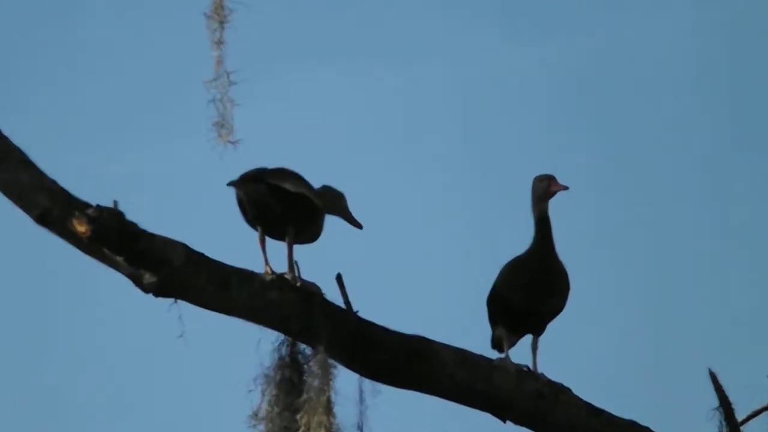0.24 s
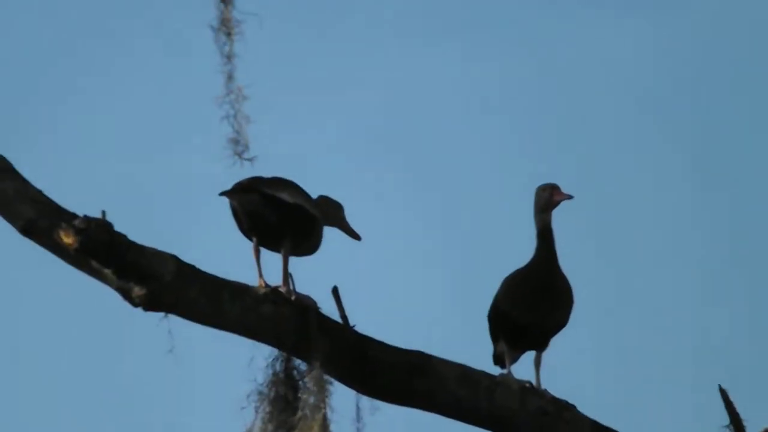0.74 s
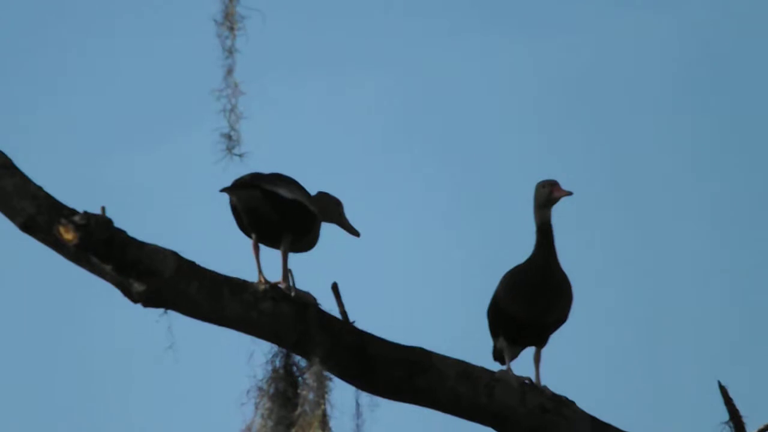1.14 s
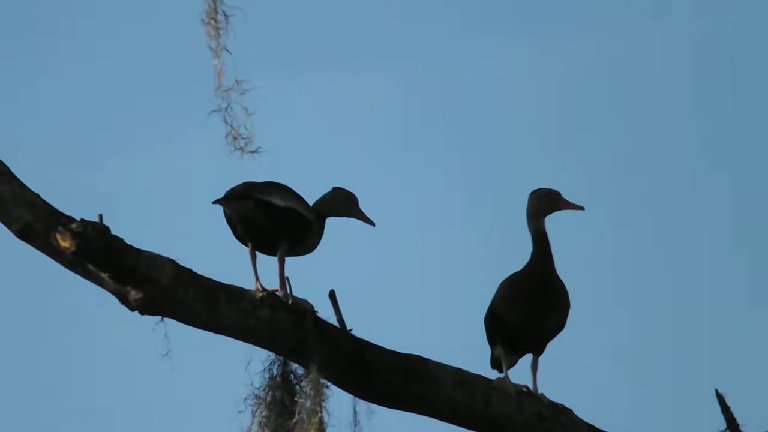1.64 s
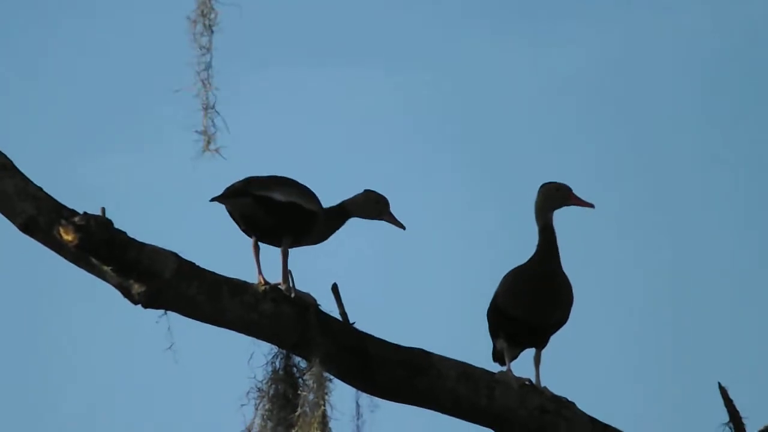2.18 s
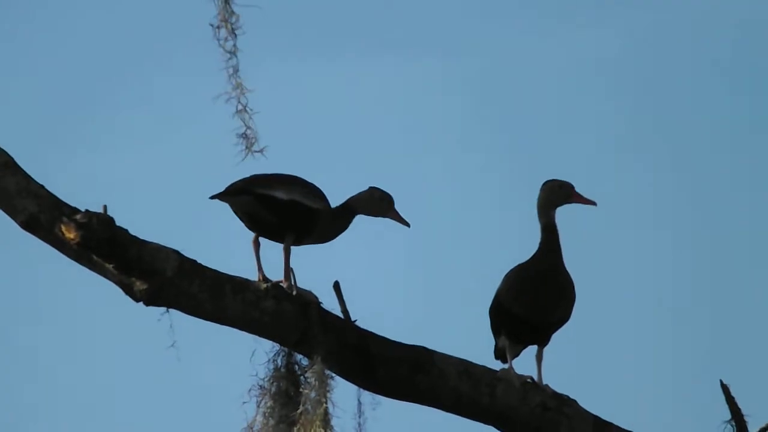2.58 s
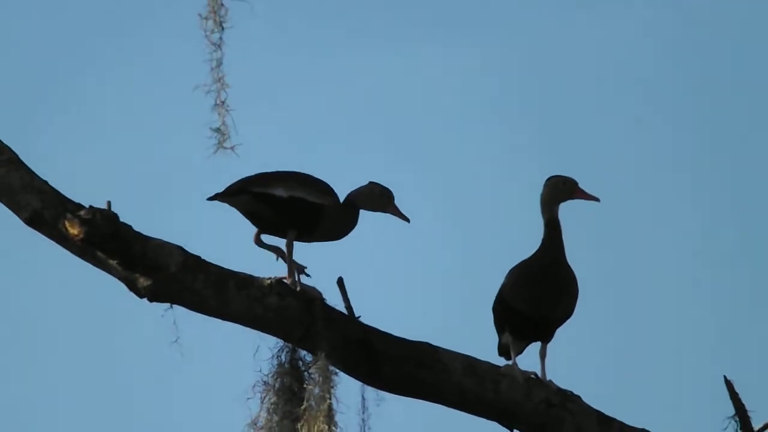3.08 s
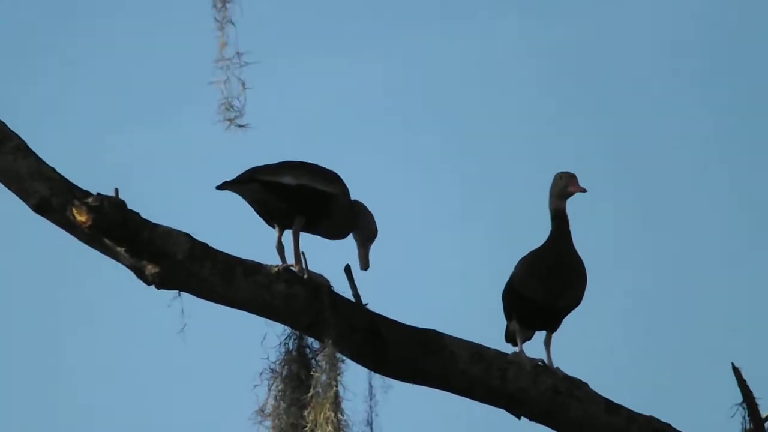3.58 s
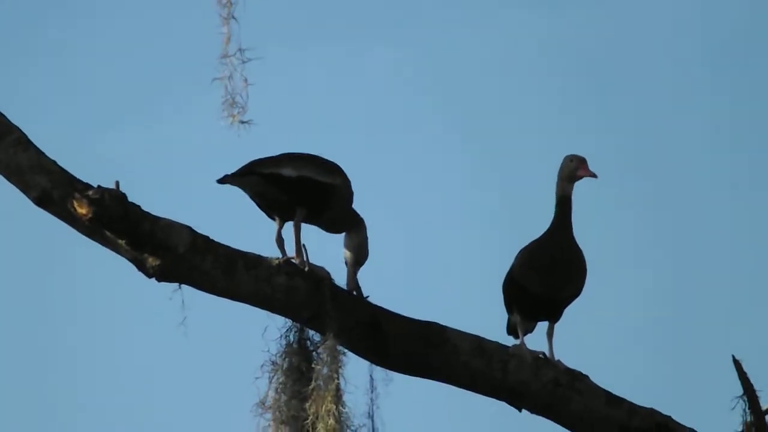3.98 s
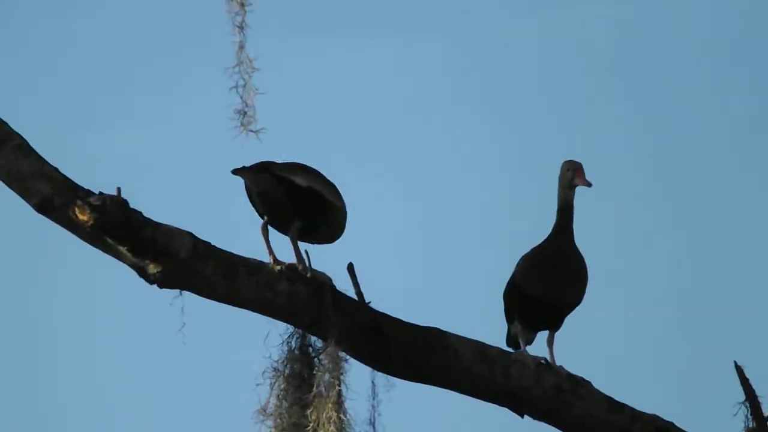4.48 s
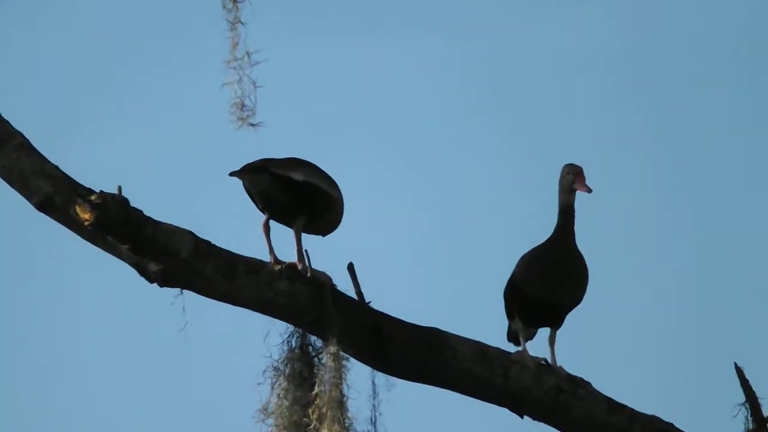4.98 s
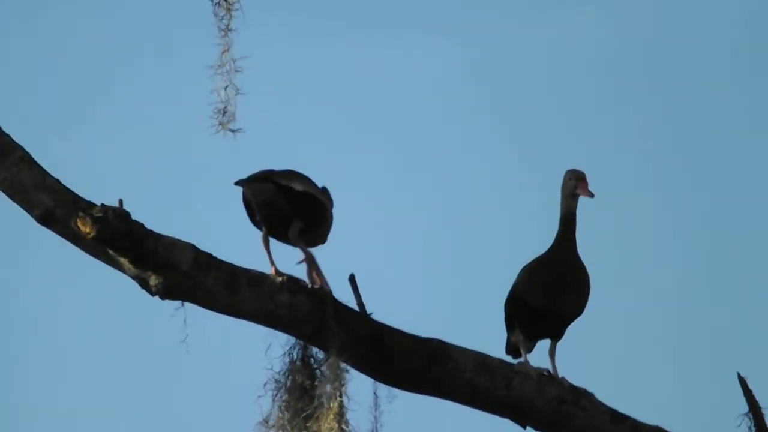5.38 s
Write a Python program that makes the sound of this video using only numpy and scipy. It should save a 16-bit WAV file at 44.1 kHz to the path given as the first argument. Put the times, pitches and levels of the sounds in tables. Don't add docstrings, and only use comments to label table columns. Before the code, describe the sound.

Outdoors at a marsh, a distant flock whistles over low air rumble and a soft insect trill. A harsh plastic snap hits the microphone early. Near ducks then squeal, sweep upward and chatter in rapid high pips, thickening to four loud yelping barks, then a softer run of hoots. The end is quiet, with faint far calls. Leaves blur the calls and trees echo them; the sound is centred, practically mono.

```python
import sys
import numpy as np
from scipy import signal
from scipy.io import wavfile
from scipy.ndimage import uniform_filter1d

SR = 44100
rng = np.random.default_rng(int(sys.argv[2]) if len(sys.argv) > 2 else 0)


def file_out(sig):
    cols = np.atleast_2d(sig).T
    lim = np.clip(cols, -1, 1)
    pcm = np.round(lim * 32767).astype(np.int16)
    wavfile.write(sys.argv[1], SR, pcm)


def nominal_scale(level):
    x = np.asarray(level, float) / 20
    return 10 ** x


N = 248283

# time in seconds, pitch in Hz, level in dB.
SQUEAL_CURVES = [
    [(0.768, 2156, -31.5), (0.782, 2760, -21), (0.815, 3280, -20), (0.845, 3394, -14), (0.866, 3353, -19),
     (0.882, 2820, -20.5), (0.905, 2665, -27)],
    [(1.02, 2740, -24.5), (1.04, 3880, -43), (1.065, 4350, -43.5), (1.087, 3210, -25.5)],
    [(1.083, 3188, -20), (1.15, 3090, -16), (1.19, 3169, -16.5), (1.24, 3350, -20.5), (1.27, 3760, -26.5),
     (1.3, 4610, -32.5), (1.345, 4780, -33.5), (1.37, 4620, -43), (1.44, 4630, -44)],
    [(2.005, 2073, -37), (2.03, 2600, -26.5), (2.05, 2894, -15), (2.078, 2834, -16), (2.09, 2290, -30),
     (2.102, 1980, -47)],
]
# start in seconds, level in dB.
BARK_STARTS = [
    (3.587, -14.5),
    (3.69, -13),
    (3.796, -13.5),
    (3.9, -13.5),
]
# seconds after the start, pitch in Hz, relative level in dB.
BARK_CURVE = [
    (0, 2322, -20.5),
    (.01, 2657, -3),
    (.014, 3195, -1),
    (0.034, 3298, -8),
    (.044, 3190, -8),
]
# start in seconds, climb in seconds, hold in seconds, level in dB.
SWEEP_NOTES = [
    (1.499, 0.094, 0.061, -18.5),
    (1.706, .056, 0.025, -20),
]

# start in seconds, middle pitch in Hz, level in dB.
PIP_RUN = [
    (2.195, 2872, -18.5),
    (2.282, 2930, -17.5),
    (2.369, 2950, -19.5),
    (2.455, 2930, -22),
    (2.543, 2943, -23.5),
    (2.633, 2840, -26.5),
    (2.813, 2920, -27),
    (3.349, 3074, -17.5),
    (3.442, 3083, -18),
]
# start in seconds, middle pitch in Hz, level in dB.
HOOT_RUN = [
    (4.15, 2778, -25.5),
    (4.235, 2792, -24.5),
    (4.325, 2865, -24.5),
    (4.413, 2873, -24),
    (4.501, 2922, -23.5),
    (4.59, 2808, -25),
    (4.686, 2927, -26.5),
    (4.786, 2795, -27),
]
# start in seconds, length in seconds, middle pitch in Hz, level in dB.
PEEP_NOTES = [
    (2.105, 0.0364, 2870, -20),
    (3.075, 0.034, 2997, -24),
    (3.166, 0.05, 3140, -22),
    (3.258, 0.048, 3140, -20.5),
    (3.315, .04, 3370, -23),
    (3.493, 0.038, 3326, -14.5),
    (3.538, 0.036, 3154, -17.5),
    (3.632, 0.035, 3185, -21.5),
    (3.735, 0.042, 3210, -20),
]
# start in seconds, length in seconds, middle pitch in Hz, level in dB.
CLUCK_NOTES = [
    (1.64, 0.038, 2920, -32.5),
    (1.85, 0.027, 2810, -23.5),
    (1.935, 0.024, 2835, -25),
    (2.02, 0.028, 2820, -24.5),
    (2.745, .013, 2840, -23),
    (2.76, .022, 3180, -21.5),
    (3.378, 0.019, 2960, -22),
    (3.472, 0.012, 3007, -18.5),
    (3.66, 0.0088, 2860, -24),
]
# start in seconds, length in seconds, middle pitch in Hz, level in dB.
DIVE_NOTES = [
    (1.465, .03, 2890, -30),
    (1.8, .025, 3000, -36),
    (1.87, .02, 2200, -40),
    (1.958, 0.023, 2280, -26.5),
    (2.255, 0.019, 2220, -40),
]
# start in seconds, length in seconds, middle pitch in Hz, level in dB.
STOOP_NOTES = [
    (2.215, .022, 3200, -27),
    (2.295, 0.043, 3290, -26.5),
    (2.383, 0.035, 3190, -25.5),
    (2.467, .036, 3480, -25.5),
    (2.555, 0.035, 3360, -24),
    (2.59, 0.073, 3370, -29.5),
]
# start in seconds, length in seconds, middle pitch in Hz, level in dB.
ARCH_NOTES = [
    (2.638, .049, 3646, -24.5),
    (2.723, .04, 3500, -20.5),
    (2.818, .045, 3437, -23.5),
    (2.918, 0.047, 3320, -27),
    (3.012, 0.045, 3530, -24.5),
    (3.112, 0.044, 3760, -27),
    (3.205, .05, 3547, -25),
]

# start in seconds, length in seconds, middle pitch in Hz, level in dB.
REEDY_FALL_NOTES = [(.795, 0.037, 2157, -34.5), (1.64, 0.018, 2404, -38.5), (2.29, 0.03, 2256, -38),
                    (2.385, 0.046, 2380, -38), (2.485, 0.02, 2390, -39), (2.55, 0.028, 2200, -27.5),
                    (2.59, 0.015, 2350, -39), (2.652, 0.051, 2180, -29), (2.895, 0.057, 2108, -28),
                    (3, 0.045, 2229, -26), (3.105, 0.057, 2170, -27.5), (3.22, .05, 2286, -29.5),
                    (3.405, 0.026, 2348, -34.5), (3.53, 0.039, 2230, -44.5), (3.59, 0.044, 1958, -32.5),
                    (3.705, 0.052, 1970, -32), (3.81, .056, 1926, -33.5), (3.94, 0.046, 1888, -34)]
# start in seconds, length in seconds, middle pitch in Hz, level in dB.
REEDY_ARCH_NOTES = [
    (2.447, 0.035, 2120, -37),
    (2.715, .095, 2500, -31.5),
    (2.85, .06, 2155, -31),
    (2.985, 0.017, 2400, -32),
]
# start in seconds, length in seconds, middle pitch in Hz, level in dB.
REEDY_RISE_NOTES = [
    (2.195, 0.055, 2340, -46.5),
    (4.065, 0.019, 2484, -39),
]
# start in seconds, length in seconds, middle pitch in Hz, level in dB.
CRACKED_NOTES = [
    (4.03, 0.0516, 2418, -33),
]

# start in seconds, length in seconds, middle pitch in Hz, level in dB.
FAR_BOW_NOTES = [
    (.705, 0.13, 3496, -43.5),
    (1.86, .17, 3540, -38),
    (4.17, 0.054, 3130, -38.5),
    (4.27, 0.031, 3050, -36),
    (4.3, 0.11, 3420, -45),
    (4.87, 0.077, 3400, -64),
    (2.26, .15, 1965, -38),
    (4.9, 0.12, 1980, -49),
]
# start in seconds, length in seconds, middle pitch in Hz, level in dB.
FAR_SAG_NOTES = [
    (.93, 0.22, 1340, -46),
    (1.15, .24, 2080, -50),
    (2.19, 0.056, 1910, -35.5),
    (2.5, 0.27, 1396, -46),
    (3.58, 0.1783, 1680, -47.5),
    (4.2, 0.19, 1385, -44),
    (3.2, 0.068, 1546, -37),
    (3.985, 0.063, 2050, -45),
    (1.77, .03, 2100, -40),
    (4.42, .14, 1400, -48),
]
# start in seconds, length in seconds, middle pitch in Hz, level in dB.
FAR_LEVEL_NOTES = [
    (0.16, 0.18, 2000, -63.5),
    (5.42, .08, 2990, -48.5),
    (8.5, .06, 7150, -50),
    (6.2, .1, 3300, -39.5),
    (5.18, 0.04, 2900, -46.5),
    (5.11, .04, 5950, -61),
]
# start in seconds, length in seconds, middle pitch in Hz, level in dB.
FAR_REEDY_NOTES = [
    (5.468, .05, 1700, -42.5),
    (5.56, .05, 1745, -40.5),
]
# start in seconds, length in seconds, middle pitch in Hz, level in dB.
FAR_RISE_NOTES = [
    (5.365, .045, 1723, -41.5),
]
# start in seconds, length in seconds, middle pitch in Hz, level in dB.
SCREECH_NOTES = [
    (5.104, .3, 1128, -59),
]

# level in dB, from the fundamental up.
NEAR_PARTIALS = [-1.5, -26.5, -34.5]
BARK_PARTIALS = [1, -26.5, -34]
ARCH_PARTIALS = [-3, -26, -35]
SQUEAL_PARTIALS = [-2.5, -28.5, -41.5]
REEDY_PARTIALS = [-2.5, -5, -18, -23.5]
CRACKED_PARTIALS = [1.5, -14, -23.5]
FAR_PARTIALS = [2, -24.5]
FAR_REEDY_PARTIALS = [-6, -2, -17]
SCREECH_PARTIALS = [-33, -31, -19, -14, -10, -2, -2]
# frequency in Hz, gain in dB.
WINDPIPE_GAIN = [(1200, -11), (1900, -15), (2300, -3.5), (2800, 2.5), (3500, 3), (4100, 1), (4900, 9),
                 (5700, 4), (6500, -4), (7400, 4), (8400, -6.5), (9400, -5.5), (11000, -5), (15000, -24.5)]

# frequency in Hz, time to fall 60 dB in seconds.
MARSH_DECAY = [(1000, 1), (3000, 0.72), (6000, 0.99), (10000, 1)]
# frequency in Hz, level in dB, time to fall 60 dB in seconds.
SHELL_MODES = [(1527, -8, 0.012), (2193, -7, 0.012), (1800, -11, 0.01), (2597, -0.5, 0.0052),
               (3250, 1, 0.011), (3514, 0, .012), (4780, -29.5, 0.011), (5500, -35.5, 0.0027),
               (7350, -32.5, 0.012), (8300, -21.5, 0.0017), (10030, -8, 0.0054), (12500, -21.5, 0.0046),
               (16100, -12.5, 0.004)]
# time in seconds, level in dB.
SHELL_BLOWS = [
    (0.3029, -13.5),
    (.3207, -19),
    (0.324, -18.5),
    (.3268, 5.5),
    (0.3288, 0.5),
    (0.3294, 1),
    (.3312, 2),
    (0.3323, -18),
]
# time in seconds, level in dB.
TICKS = [
    (.035, -54),
    (.055, -54),
    (.405, -51.5),
    (4.708, -54),
    (5.001, -51.5),
]
# time in seconds, level in dB.
FLOCK_LEVEL = [
    (0, -34),
    (.3, -37),
    (.7, -49),
    (1.5, -42),
    (3.002, -34),
    (4.5, -51.5),
    (5.1, -50.5),
    (5.63, -41),
]
# time in seconds, pulses per second, level in dB.
TRILL_CURVE = [
    (0, 19.75, -50.5),
    (2.799, 24, -50),
    (5.63, 19.65, -52.5),
]
# frequency in Hz, level in dB per Hz.
AIR_SPECTRUM = [(20, -0.5), (45, -0.5), (70, -7), (100, -4.5), (150, -15), (250, -20.5), (600, -27),
                (1250, -29.5), (3200, -25), (4200, -29), (5500, -45.5), (8000, -45.5), (12000, -50),
                (16000, -50.5)]

PIP, HOOT, PEEP, CLUCK, DIVE = (.92, 1.04), (.95, .92), (.9, .84), (1.02, .94), (1.17, .84)
STOOP, ARCH, DROOP, BOW, RISE = (1.02, .8), (.83, .7), (1, .8), (.82, .72), (.9, 1.07)
FAR_BOW, FAR_SAG, LEVEL, SCREECH = (.89, .9), (1.18, .9), (1.02, .98), (1.14, .95)


def whistle(hz, partials_db, rasp=.02, rasp_growth=.25):
    turn = 2 * np.pi * np.cumsum(hz) / SR
    noise = rng.standard_normal(len(hz))
    turbulence = evened(uniform_filter1d(uniform_filter1d(noise, 36), 36))
    out = np.zeros(len(hz))
    for k, db in enumerate(partials_db, 1):
        fray = 1 + (rasp + rasp_growth * min(k - 1, 2)) * turbulence
        level = np.sqrt(2) * nominal_scale(db + read(WINDPIPE_GAIN, k * hz))
        out += level * fray * np.sin(k * turn)
    return out


def notes(rows, partials_db, flat=2.307, rise=0.047, fade=0.13, rasp=0.039):
    out, shake, flutter = np.zeros(N), wander(60), wander(150)
    for s, length, first_hz, middle_hz, last_hz, db in rows:
        u = np.linspace(0, 1, round(length * SR))
        slope = (last_hz - first_hz) / 2
        arch = (first_hz + last_hz) / 2 - middle_hz
        hz = middle_hz + slope * (2 * u - 1) + arch * abs(2 * u - 1) ** flat
        wobble = 1 + .003 * np.resize(shake[round(s * SR):], len(u))
        ramp = np.minimum(u / rise, (1 - u) / fade)
        breath = np.sin(np.pi / 2 * np.clip(ramp, 0, 1)) ** 2
        add(out, s, nominal_scale(db) * breath * whistle(hz * wobble, partials_db, rasp))
    return out * nominal_scale(.8 * flutter)


def slurs(curves, partials_db):
    out = np.zeros(N)
    for rows in curves:
        s, hz, db = np.transpose(rows)
        t = np.arange(s[0], s[-1], 1 / SR)
        glide = uniform_filter1d(np.interp(t, s, hz), 200)
        soft_ends = signal.windows.tukey(len(t), 180 / len(t))
        add(out, s[0], nominal_scale(np.interp(t, s, db)) * soft_ends * whistle(glide, partials_db))
    return out * nominal_scale(1.7 * wander(200))


def shaped(rows, gesture, length=None):
    if length is not None:
        rows = [(s, length, hz, db) for s, hz, db in rows]
    first, last = gesture
    return [(s, span, first * hz, hz, last * hz, db) for s, span, hz, db in rows]


def barks():
    return [[(s + after, hz, db + rel) for after, hz, rel in BARK_CURVE] for s, db in BARK_STARTS]


def sweeps():
    low_hz, high_hz, loss_db = 2660, 5580, -17.5
    halfway_hz = low_hz + .47 * (high_hz - low_hz)
    curves = []
    for s, climb, hold, db in SWEEP_NOTES:
        top_s, top_db = s + climb, db + loss_db
        curves.append([(s, low_hz, db),
                       (s + climb / 2, halfway_hz, db + 0.43 * loss_db),
                       (top_s, high_hz, top_db),
                       (top_s + hold, .99 * high_hz, top_db - 6)])
    return curves


def near_ducks():
    chatter = shaped(PIP_RUN, PIP, 0.0213) + shaped(HOOT_RUN, HOOT, 0.0403)
    chatter += shaped(PEEP_NOTES, PEEP) + shaped(CLUCK_NOTES, CLUCK)
    arches = shaped(STOOP_NOTES, STOOP) + shaped(ARCH_NOTES, ARCH) + shaped(DIVE_NOTES, DIVE)
    calls = slurs(barks(), BARK_PARTIALS) + notes(chatter, NEAR_PARTIALS, flat=2.2, fade=0.26)
    return calls + notes(arches, ARCH_PARTIALS, flat=2.7, rise=.1, fade=.25, rasp=.1)


def hidden_ducks():
    reedy = shaped(REEDY_FALL_NOTES, DROOP) + shaped(REEDY_ARCH_NOTES, BOW) + shaped(REEDY_RISE_NOTES, RISE)
    calls = notes(reedy, REEDY_PARTIALS, flat=2.1, rise=.1, fade=.28, rasp=.03)
    calls += notes(shaped(CRACKED_NOTES, RISE), CRACKED_PARTIALS, fade=0.25, rasp=.15)
    return calls + slurs(sweeps(), SQUEAL_PARTIALS)


def far_ducks():
    whistles = shaped(FAR_BOW_NOTES, FAR_BOW) + shaped(FAR_SAG_NOTES, FAR_SAG) + shaped(FAR_LEVEL_NOTES, LEVEL)
    reedy = shaped(FAR_REEDY_NOTES, DROOP) + shaped(FAR_RISE_NOTES, RISE)
    calls = notes(whistles, FAR_PARTIALS)
    calls += notes(shaped(SCREECH_NOTES, SCREECH), SCREECH_PARTIALS, rasp=0.21)
    return calls + notes(reedy, FAR_REEDY_PARTIALS, fade=0.24, rasp=.1)


def snap():
    out, t = np.zeros(N), np.arange(2000) / SR
    for s, db in SHELL_BLOWS:
        signs = rng.choice([-1., 1.], len(SHELL_MODES))
        ring = np.zeros(len(t))
        for sign, (hz, mode_db, t60) in zip(signs, SHELL_MODES):
            dull_db = min(db - 8.5, 0) * hz / 7000
            ring += sign * nominal_scale(mode_db + dull_db - 60 * t / t60) * np.sin(2 * np.pi * hz * t)
        add(out, s, nominal_scale(db) * ring)
    out = signal.lfilter(*signal.butter(5, 1450, "high", fs=SR), out)
    for s, db in TICKS:
        bright_noise = np.diff(rng.standard_normal(len(t) + 1))
        add(out, s, nominal_scale(db - 60 * t / .02) * bright_noise)
    return out


def foliage(x):
    t = np.arange(round(.25 * SR)) / SR
    leaves = rng.standard_normal(len(t)) * (rng.random(len(t)) < .03)
    taps = leaves * nominal_scale(-60 * t / 0.16) * (t > .003)
    return signal.fftconvolve(x, taps / np.linalg.norm(taps))[:N]


def marsh(x, swell_s=0.012):
    taps = np.zeros(SR)
    at = np.arange(300, SR - 20, 20)
    swell = 1 - np.exp(-at / SR / swell_s)
    taps[at + rng.integers(0, 20, len(at))] = rng.choice([-1., 1.], len(at)) * swell
    hz, t, z = signal.stft(taps, SR, nperseg=256)
    decay = nominal_scale(-60 * t / read(MARSH_DECAY, hz)[:, None])
    tail = signal.istft(z * decay, SR, nperseg=256)[1]
    return signal.fftconvolve(x, tail / np.linalg.norm(tail))[:N]


def flock(count=340):
    when, length, pitch, rise, fall, size = rng.random((count, 6)).T
    start = when * (N / SR - .01)
    hz = 2650 + 950 * pitch
    first_hz, last_hz = hz * (1 - 0.21 * rise), hz * (1 - 0.23 * fall)
    rows = zip(start, 0.0337 + .07 * length, first_hz, hz, last_hz, 12 * size)
    calls = notes(rows, [0, -24])
    s, db = np.transpose(FLOCK_LEVEL)
    distant = np.roll(0.25 * calls + marsh(calls), -SR)
    return nominal_scale(np.interp(np.arange(N) / SR, s, db)) * evened(distant)


def insect():
    t = np.arange(N) / SR
    s, rate, db = np.transpose(TRILL_CURVE)
    turns = np.cumsum(np.interp(t, s, rate)) / SR
    phase = (turns - np.interp(5.094, t, turns)) % 1
    u = np.clip(phase / 0.63, 0, 1)
    hz = 4100 - 1300 * (u - .4) ** 2
    uneven_db = 2.5 * wander(1500)
    return nominal_scale(np.interp(t, s, db) + uneven_db) * np.sin(np.pi * u) * whistle(hz, [0])


def hum():
    t = np.arange(N) / SR
    fuzz = wander(1600) + 1j * wander(1600)
    line = (fuzz * np.exp(2j * np.pi * 101 * t)).real
    return nominal_scale(np.interp(t, [0, 4, 5.6], [-46, -45, -40])) * line


def air():
    frames, hz = N // 256 + 5, np.fft.rfftfreq(1024, 1 / SR)
    a, b, patches = rng.standard_normal((frames, 513, 3)).T
    patches = evened(uniform_filter1d(uniform_filter1d(patches, 12, 0), 14, 1))
    z = (a + 1j * b) * nominal_scale(read(AIR_SPECTRUM, hz)[:, None] + 0.9 * patches)
    noise = signal.istft(z, nperseg=1024, noverlap=768)[1][:N]
    return nominal_scale(-36) * evened(noise)


def evened(x):
    return x / np.sqrt(np.mean(x ** 2) + 1e-20)


def read(points, hz):
    f, value = np.transpose(points)
    return np.interp(np.log(hz + 1), np.log(f + 1), value)


def add(mix, s, sound):
    part = mix[round(s * SR):][:len(sound)]
    part += sound[:len(part)]


def wander(samples):
    size = max(int(samples), 1)
    return evened(uniform_filter1d(uniform_filter1d(rng.standard_normal(N), size), size))


def scene():
    near, hidden = near_ducks(), hidden_ducks()
    middle = slurs(SQUEAL_CURVES, SQUEAL_PARTIALS)
    far = far_ducks() + insect()
    blur = foliage(nominal_scale(-12) * near + nominal_scale(-8) * hidden + nominal_scale(-10) * middle + nominal_scale(-7) * far)
    echo = marsh(nominal_scale(-7.5) * near + nominal_scale(-6) * hidden + nominal_scale(-9) * middle + nominal_scale(-14.5) * far)
    calls = near + hidden + middle + far + blur + echo
    return np.tile(calls + flock() + air() + hum() + snap(), (2, 1))


def low_pass(x):
    return signal.sosfilt(signal.butter(12, 15800, fs=SR, output="sos"), x)


def record(dry):
    power_db = 10 * np.log10(abs(uniform_filter1d(dry[0] ** 2, 200, origin=99)) + 1e-12)
    fall = np.arange(N) * 38.0 / SR
    held_db = np.maximum.accumulate(power_db + fall) - fall
    over_db = np.maximum(held_db + 9, 0)
    ducked = dry[0] / nominal_scale(.5 * uniform_filter1d(over_db, 300, origin=149))
    right = np.clip(ducked, -1, 1)
    return low_pass(np.array([np.roll(right, 1), right]))


dry = scene()
out = record(dry)
file_out(out)
```